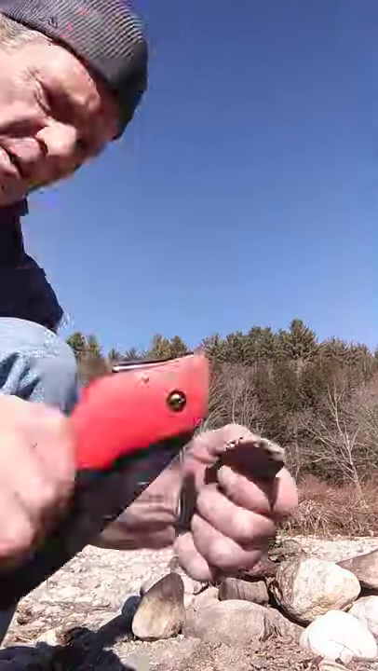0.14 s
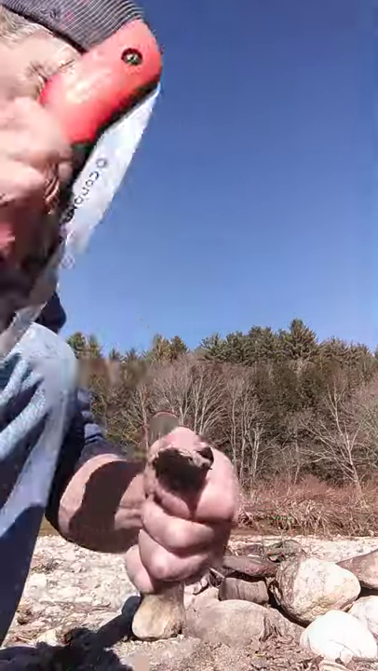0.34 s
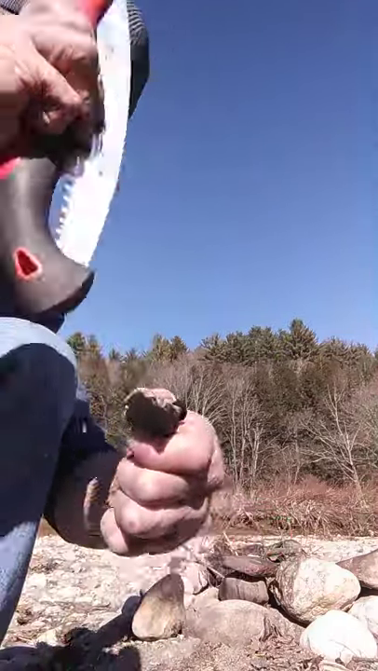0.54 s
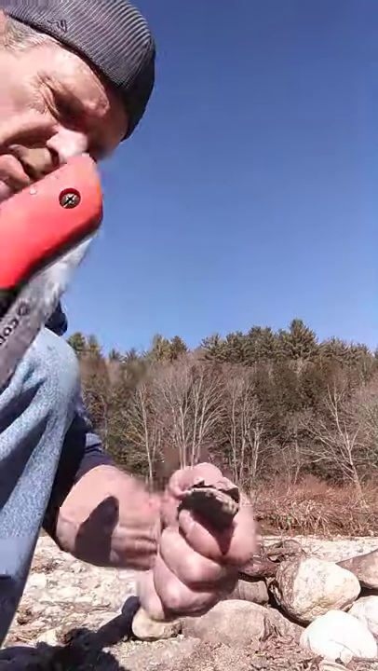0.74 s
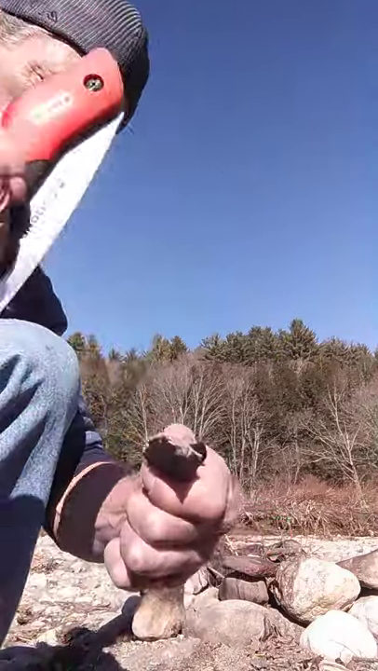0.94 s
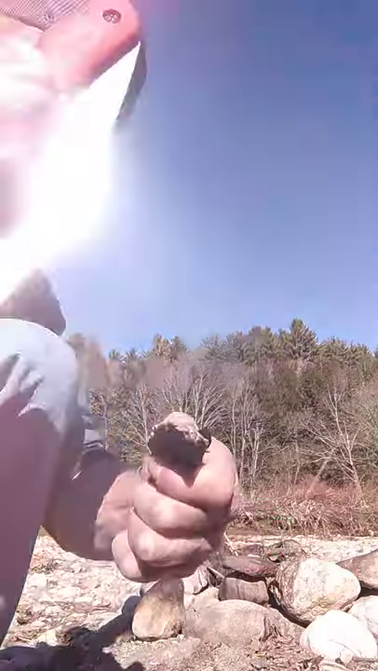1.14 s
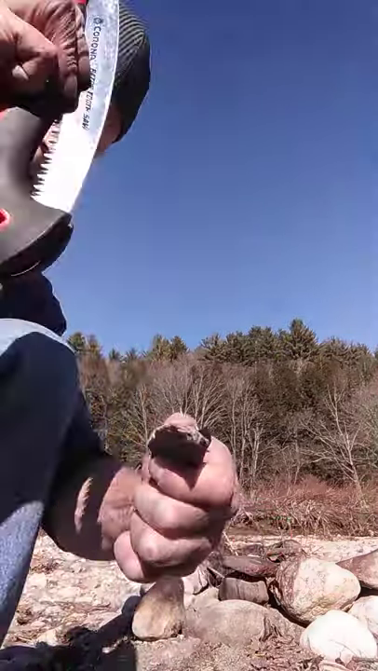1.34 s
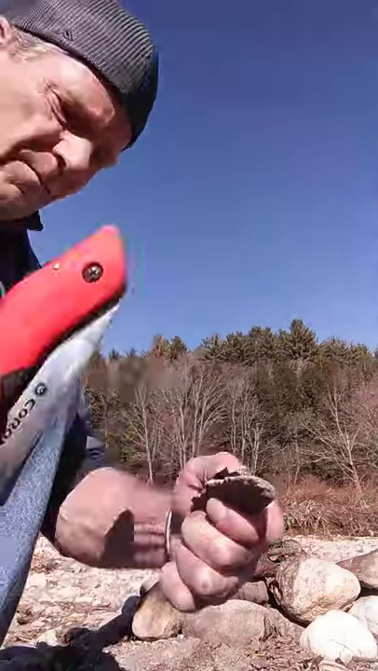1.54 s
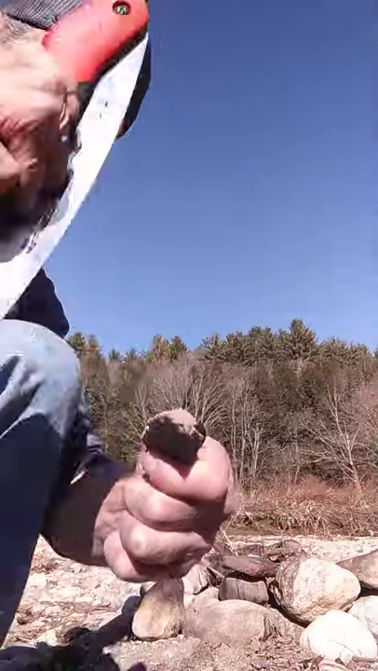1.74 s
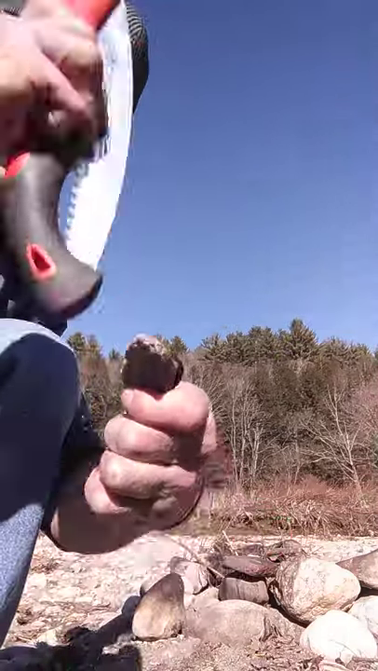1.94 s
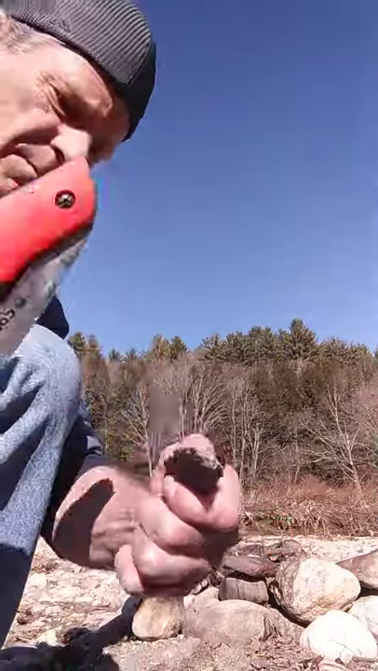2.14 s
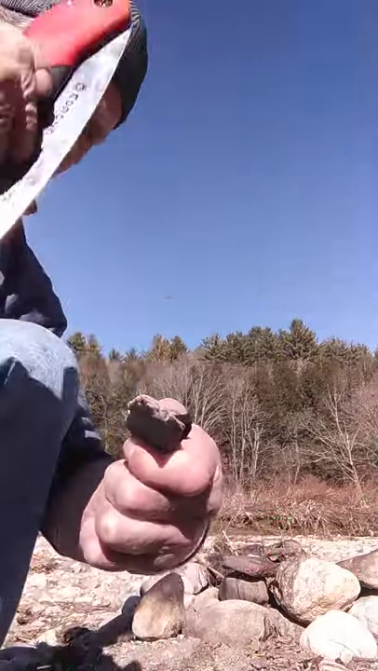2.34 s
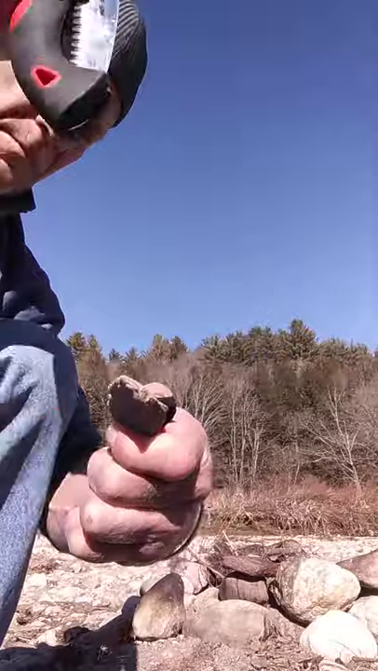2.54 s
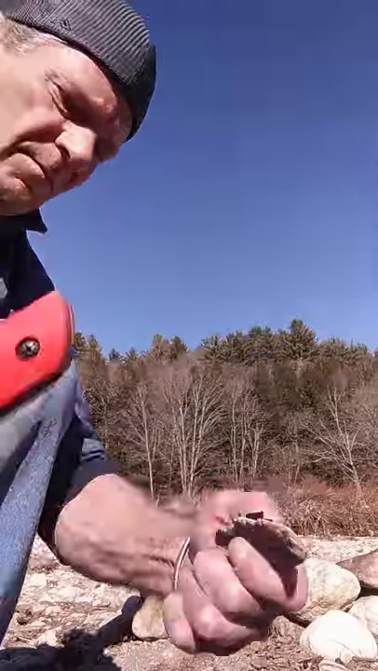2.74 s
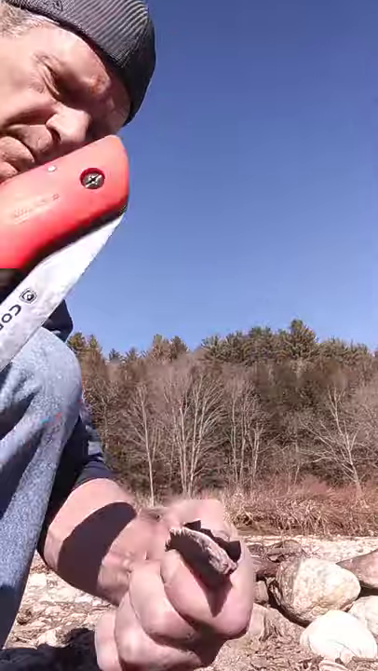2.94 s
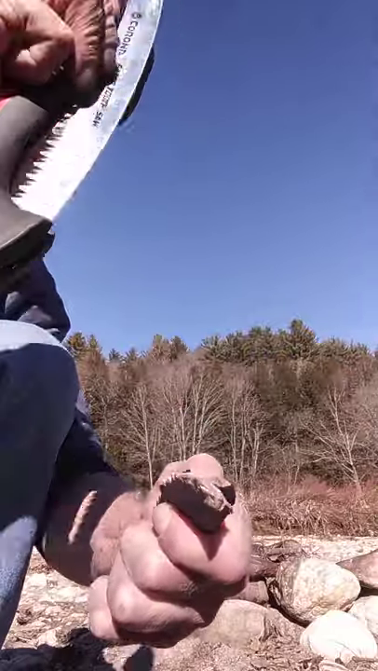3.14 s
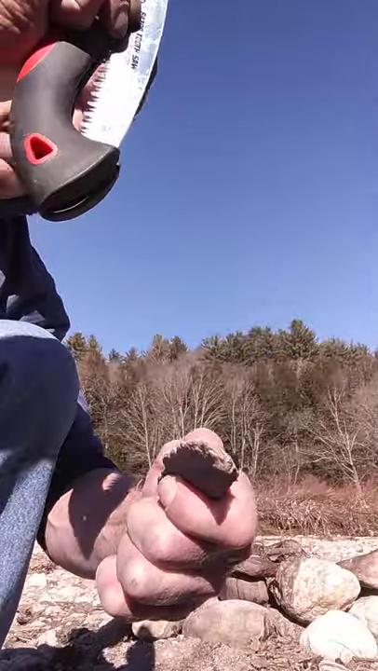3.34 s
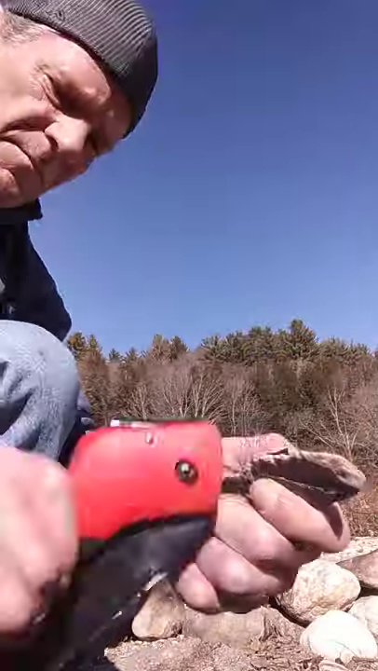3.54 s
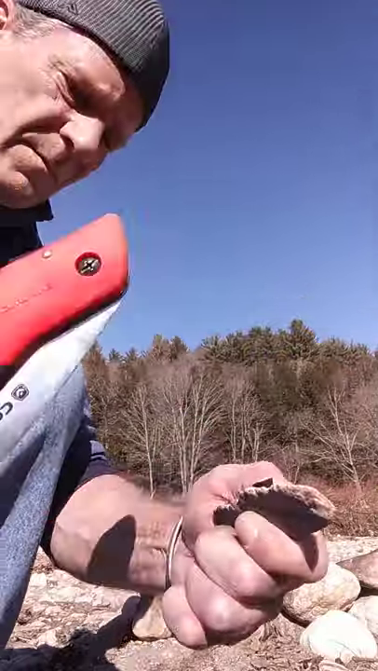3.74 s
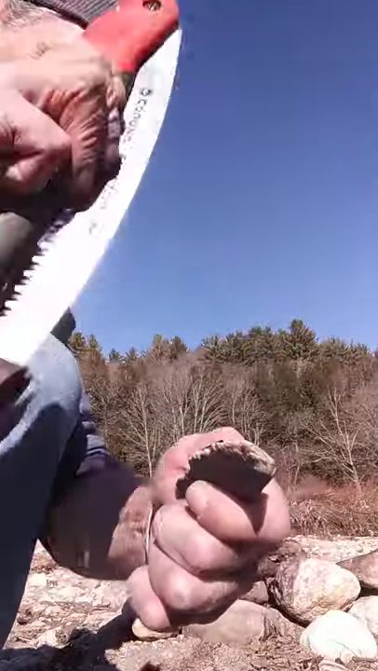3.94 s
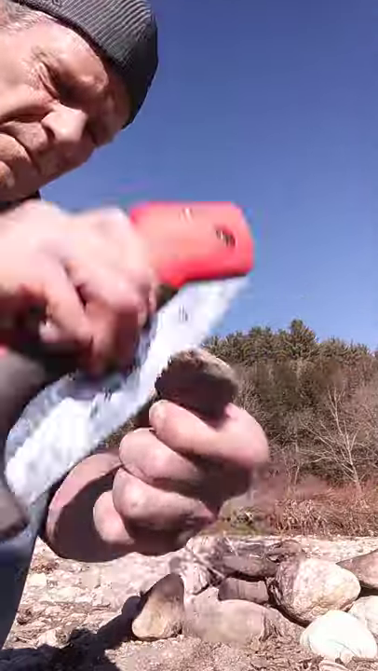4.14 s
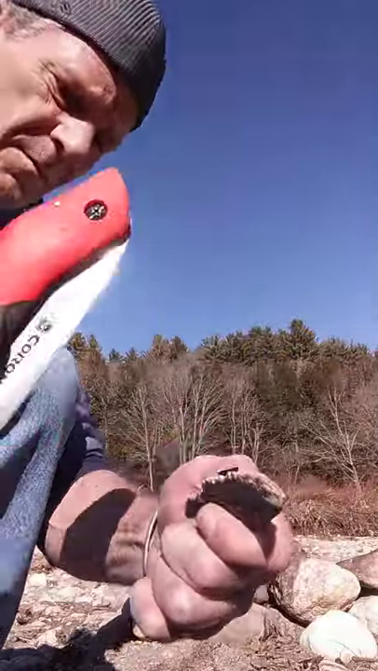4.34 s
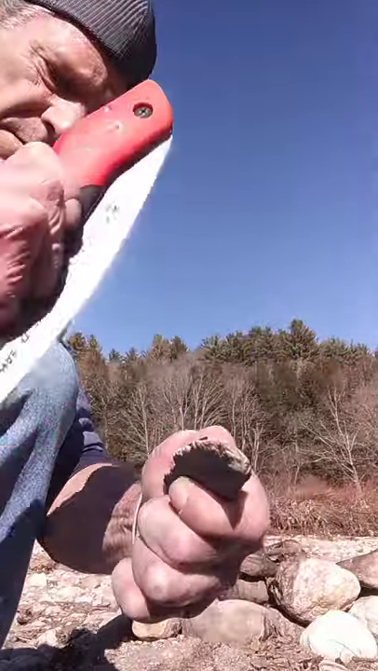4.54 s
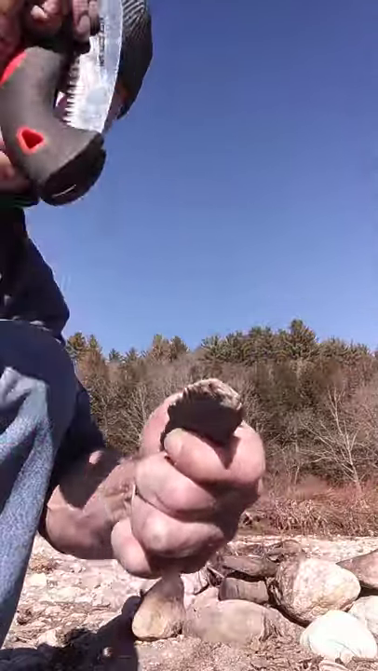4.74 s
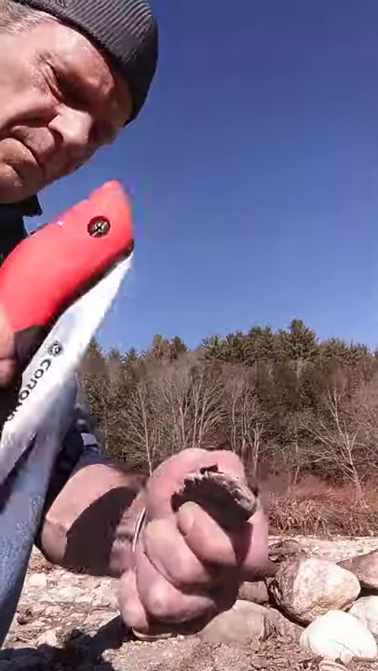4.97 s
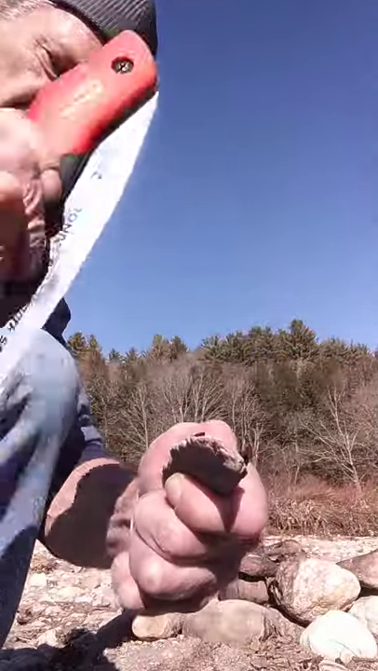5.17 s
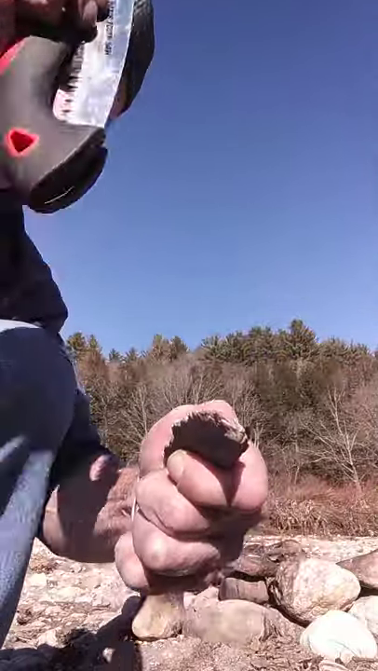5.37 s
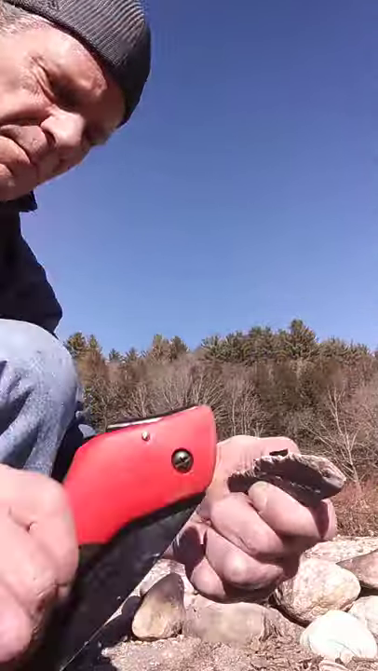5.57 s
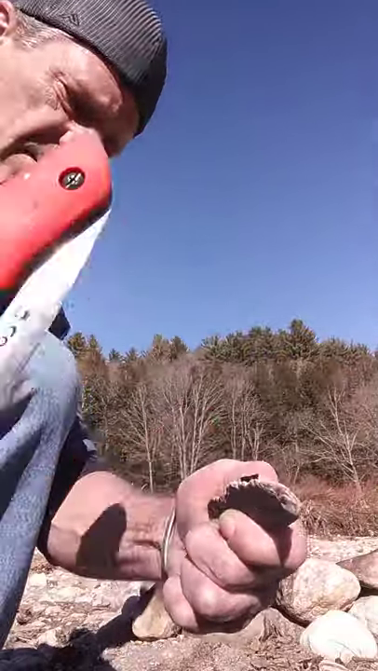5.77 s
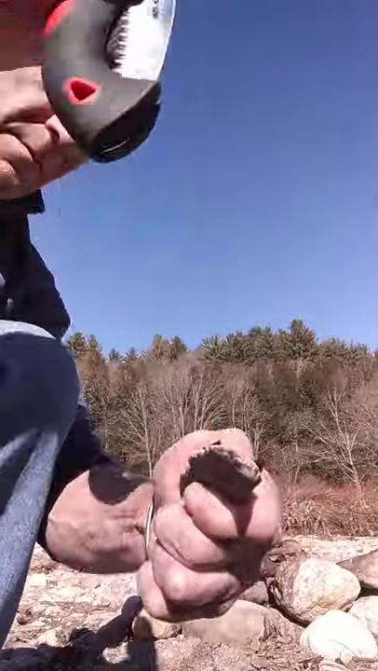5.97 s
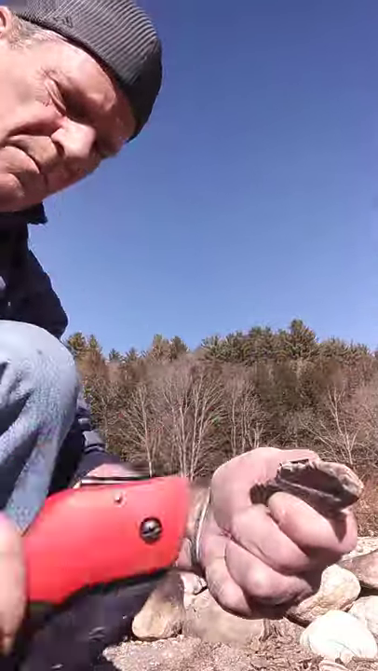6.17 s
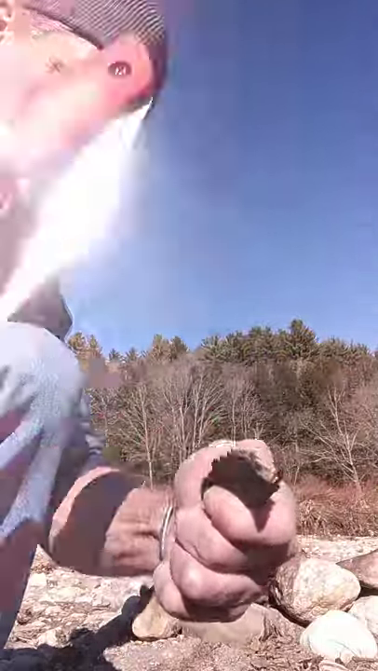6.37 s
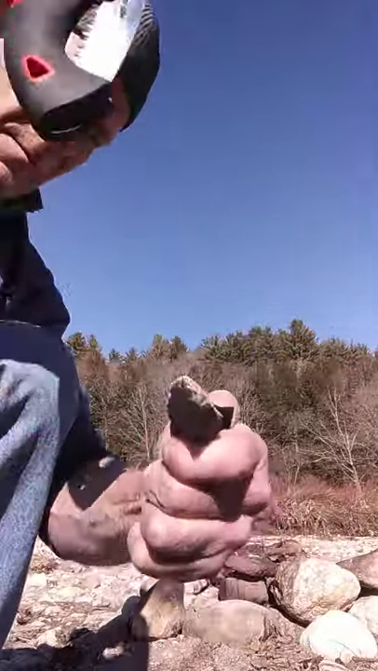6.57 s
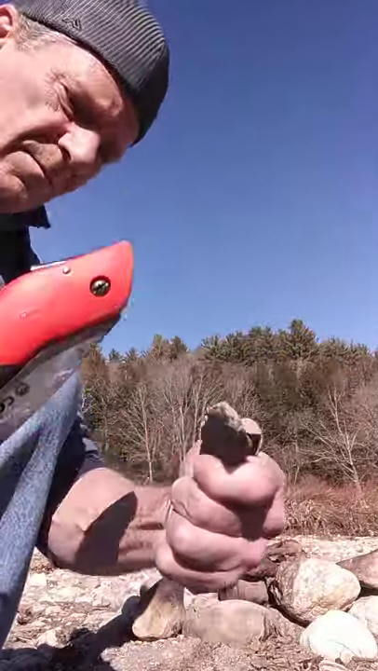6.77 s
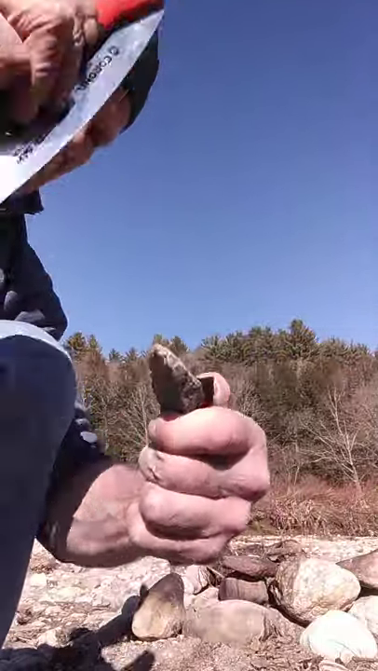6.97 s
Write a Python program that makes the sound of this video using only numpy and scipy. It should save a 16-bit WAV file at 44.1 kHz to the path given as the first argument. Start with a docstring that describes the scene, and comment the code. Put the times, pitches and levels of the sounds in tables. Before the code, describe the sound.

Eleven loud, crisp strikes of steel on flint over about seven seconds, slightly uneven in timing, force and pitch. The first ones clink clearly; later ones are drier and scrapier. Light ticks, hollow knocks and barely audible flakes fall between them. Blade overtones fade within a fraction of a second, with a faint dull outdoor tail. Soft river rush with small bubbles continues throughout; close, mono, bass-light phone sound with squashed peaks.

```python
"""A phone close by on a stony river bank hears a steel saw blade strike a hand-held flint eleven times.
Each blow opens with a crack of filtered noise and a rasp of chipping grains lasting 20 to 30 ms.
As the steel slips off, the stone clinks in decaying modes, while the blade's own modes ring on faintly.
Then come brief touches of the blade, clicks and knocks of noise, faint flakes and a dull tail off the bank.
The river rushes behind throughout, as coloured noise and rising bubbles. The blows overload the microphone."""
import sys
import numpy as np
from scipy import signal
from scipy.fft import rfft, irfft
from scipy.io import wavfile
from scipy.ndimage import uniform_filter1d, minimum_filter1d

SR = 44100
rng = np.random.default_rng(int(sys.argv[2]) if len(sys.argv) > 2 else 0)


def store_wav(level_fs):
    """Save 16-bit WAV to argv[1]."""
    pcm = np.round(np.clip(np.atleast_2d(level_fs), -1, 1) * 32767)
    wavfile.write(sys.argv[1], SR, pcm.T.astype(np.int16))


N = 309141
T = np.arange(int(0.9 * SR)) / SR  # time within one event, in seconds

# Blows of the blade on the flint. Each row: start in seconds, relative level in dB, contact length in
# seconds, clink in dB, extra for the upper clink modes in dB, place along the blade from -1 to 1.
BLOWS = [(.1767, -0.5, 0.021, 3, -10, -.6), (0.6616, 0.5, .026, 1.5, -6.5, -0.16),
         (1.4999, -0.5, 0.025, -0.5, -8, -.5), (2.049, 0, 0.026, -4.5, 5, -0.65),
         (2.7015, 2.5, 0.024, -0.5, -2.5, -.5), (3.5809, 0, 0.028, -3.5, -1, -0.64),
         (4.2184, -3, 0.032, -4.5, -2.5, 0.35), (4.8942, 2.5, 0.029, -1, -5.5, -0),
         (5.6006, -1, .024, -6, 4, 0.57), (6.1898, 4.5, 0.027, -14, -8.5, 0.16),
         (6.7195, 1.5, 0.026, -2, -1.5, -.05)]
# The blade touches the stone again. Each row: start in seconds, relative level in dB,
# clink in dB relative to the touch.
TOUCHES = [(0.6951, -12, 1), (2.0971, -11, 7.5), (2.7827, -4.5, -8), (2.798, -15.5, 5), (3.634, -8.5, 5.5),
           (4.2502, -13, -6), (4.2602, -18.5, 0), (6.238, -20.5, -1)]
# Modes of the flint when free. Each row: nominal frequency in Hz, relative level in dB,
# time to decay by 60 dB in seconds.
FLINT_MODES = [(1700, -14, .06), (3050, -20, .04), (4040, -20, .045), (4805, 0, .052), (5600, 0, .05),
               (6360, -9, .04)]
# Colour of steel scraping on flint. Each row: frequency in Hz, relative level in dB.
RASP_COLOUR = [(300, -27), (650, -28), (1200, -15.5), (1700, -7.5), (2100, -7), (3150, -4.5), (3420, -11),
               (4000, -3), (4650, -0.5), (5050, -3.5), (5650, -1.5), (6600, -6), (7800, -16),
               (15500, -29.5)]


def undb(db):
    """Decibels to amplitude gain."""
    return 10 ** (np.asarray(db) / 20)


def unit(x):
    """Scale to rms 1."""
    return x / np.sqrt(np.mean(x ** 2))


def decay(seconds, t60_s):
    """Exponential decay that falls by 60 dB in t60_s."""
    return np.exp(-np.log(1000) * seconds / t60_s)


def add(track, start_s, sound):
    """Mix a sound into the track, cut off at the track's end."""
    i = int(start_s * SR)
    track[i:i + len(sound)] += sound[:N - i]


def colour(x, points, tilt_db=0):
    """Minimum-phase filter of unit energy through (Hz, dB) points, tilted in dB per octave above 1 kHz."""
    size = 4096
    octave = np.log2(np.maximum(np.fft.rfftfreq(size, 1 / SR), 1))
    hz, db = np.transpose(points)
    level_db = np.interp(octave, np.log2(hz), db) + tilt_db * np.maximum(octave, 10)
    # folding the cepstrum forward in time makes the filter causal
    cepstrum = irfft(np.log(undb(level_db)))
    cepstrum[1:size // 2] *= 2
    cepstrum[size // 2 + 1:] = 0
    response = irfft(np.exp(rfft(cepstrum)))
    return signal.fftconvolve(x, response / np.linalg.norm(response))[:len(x)]


def walk(steps_per_s):
    """Random wander of rms 1: random steps smoothed twice."""
    k = int(SR / steps_per_s)
    steps = np.repeat(rng.standard_normal(N // k + 1), k)
    smooth = uniform_filter1d(uniform_filter1d(steps, k), k)
    return unit(smooth[:N])


def ring(modes, detune):
    """Sum of decaying modes (Hz, dB, t60 in s), which the grip shifts a little from blow to blow."""
    out = np.zeros(len(T))
    for hz, db, t60_s in modes:
        shift, phase = rng.uniform(-1.012, 1, 2)
        cycles = hz * (1 + detune * shift) * T + phase
        out += undb(db) * decay(T, t60_s) * np.sin(2 * np.pi * cycles)
    return out


def blows(rasp_db=-5, bite_db=0, clink_db=-2, blade_db=-32.5, touch_blade_db=-42):
    """Blows crack, rasp, clink and ring the blade; later touches are brief and damp the blows' ringing."""
    slip_s = 0.0065  # the clink starts this long before the contact ends
    tilt_db, tilt_per_db = -1.28, 0.41  # treble in dB per octave; a harder blow is brighter
    out = np.zeros(N)
    for start, db, length, stone_db, upper_db, place in BLOWS:
        scrape = rasp(length, -10, tilt_db + tilt_per_db * db, release_t60_s=0.045)
        add(out, start, undb(bite_db + db) * bite())
        add(out, start, undb(rasp_db + db) * scrape)
        add(out, start + length - slip_s, undb(clink_db + stone_db) * clink(upper_db, build_s=0.0052))
        add(out, start, undb(blade_db) * blade(place) * damping(start))
    for start, db, stone_db in TOUCHES:
        scrape = rasp(0.0021, 0, 0, release_t60_s=0.031)
        # a touch wakes mostly the lower clink
        stone = clink(upper_db=-12.5, build_s=0.002)
        add(out, start, undb(rasp_db + db) * scrape)
        add(out, start, undb(clink_db + db + stone_db) * stone)
        add(out, start, undb(touch_blade_db + db) * blade(0))
    return out


def bite(t60_s=0.033, tilt_db=1):
    """The bright crack of first contact: decaying noise in the colour of the rasp."""
    return colour(rng.standard_normal(len(T)) * decay(T, t60_s), RASP_COLOUR, tilt_db)


def rasp(length_s, pressure_fade_db, tilt_db, release_t60_s, grains_per_s=9000, chatter_hz=380, body_db=-5):
    """Steel chips the flint: dense grains in uneven slips, dying away once the contact ends."""
    grains = (rng.random(len(T)) < grains_per_s / SR) * rng.standard_normal(len(T))
    slip_levels = rng.standard_normal(len(T))
    slips = undb(2.6 * np.interp(T * chatter_hz, np.arange(len(T)), slip_levels))
    # the push weakens over the contact
    pressure = undb(pressure_fade_db * np.minimum(T / length_s, 1))
    release = decay(np.maximum(T - length_s, 0), release_t60_s)
    force = unit(grains * slips) * pressure * release
    # while the steel presses on it, the stone's modes are damped
    body = ring([(hz, db, 0.02) for hz, db, _ in FLINT_MODES], detune=0.012)
    stone = signal.fftconvolve(force, body / np.linalg.norm(body))[:len(T)]
    return colour(force, RASP_COLOUR, tilt_db) + undb(body_db) * stone


def clink(upper_db, build_s):
    """The stone's short ring, which builds up as the steel slides off its edge."""
    modes = [(hz, db + upper_db * (hz > 5200), t60_s) for hz, db, t60_s in FLINT_MODES]
    return ring(modes, detune=0.005) * (1 - np.exp(-(T / build_s) ** 2))


def blade(place):
    """The place where the blade is hit sets how loud each of its modes sings."""
    # Modes of the steel blade. Each row: nominal frequency in Hz, relative level in dB at place 0,
    # time to decay by 60 dB in seconds, change in dB per unit of place along the blade.
    blade_modes = [(893, -14, .4, 0), (1932, -12, .3, 4), (2158, -6, .28, 0), (2380, -1.5, .48, 0),
                   (3480, -11, .22, 3), (3994, -7, .26, 2), (4118, 0, .25, -1), (4231, -8, .26, 1),
                   (4340, -13, .26, 0), (4558, -8, .42, 13), (4562, -14, .6, 11), (4843, -9, .25, 0),
                   (5095, 0, .26, -3), (5663, -16, .3, 0), (5740, -16, .3, 0), (6017, -19, .7, -1)]
    modes = [(hz, db + place * change_db, t60_s) for hz, db, t60_s, change_db in blade_modes]
    return ring(modes, detune=0.0003)


def damping(start, share=0.63):
    """Each touch after a blow stops a share of the blade's ring; a harder touch stops more."""
    gain = np.ones(len(T))
    for touch, db, _ in TOUCHES:
        if touch > start:
            gain[T > touch - start] *= 1 - share * undb(db)  # the full share is for a touch at 0 dB
    return gain


def clicks_and_knocks(octave_t60_s=0.024):
    """Short clicks, and hollow knocks near 1.8 kHz, probably the flint's low mode; narrower bands ring longer."""
    # Short clicks and hollow knocks. Each row: start in seconds, relative level in dB,
    # centre in Hz, width in octaves.
    bursts = [(.3425, -22.5, 2300, 2.4), (.4904, -40, 2280, 2), (.8795, -42.5, 2200, 1.8),
              (2.759, -23.5, 1850, 0.65), (2.798, -23, 1720, 0.29), (2.9694, -39.5, 1670, 1.8),
              (4.7007, -41.5, 2120, 1.8), (5.633, -22.5, 1840, .6), (6.164, -40.5, 4160, 2.2),
              (6.2573, -17, 3080, 2.02), (6.8249, -9.5, 1920, 2.77)]
    out = np.zeros(N)
    for start, db, hz, octaves in bursts:
        spread = 2 ** (octaves / 2)
        add(out, start, undb(db) * click(hz / spread, hz * spread, octave_t60_s / octaves))
    return out


def click(low_hz, high_hz, t60_s, order=3):
    """A decaying burst of noise between two edges, made up in level for its bandwidth."""
    edges = signal.butter(order, [low_hz, high_hz], "band", fs=SR, output="sos")
    burst = rng.standard_normal(len(T)) * decay(T, t60_s)
    return signal.sosfilt(edges, burst) * np.sqrt(SR / 2 / (high_hz - low_hz))


def chips(flake_db=-55, size_db=8, count=2):
    """Flakes knocked off by each blow patter faintly on the stones as octave-wide clicks."""
    out = np.zeros(N)
    for start, *_ in BLOWS:
        for flight, size, pitch in rng.random((count, 3)):
            low_hz = 1800 * 4 ** pitch
            landing = start + 0.08 + 0.2 * flight
            add(out, landing, undb(flake_db + size_db * size) * click(low_hz, 2 * low_hz, t60_s=0.012))
    return out


def bank(near, tail_db=-42):
    """Stones and trees scatter a faint, dull tail back: convolution with swelling, fading noise."""
    b, a = signal.iirpeak(1900, 0.5, SR)  # a broad resonance, applied twice
    noise = signal.lfilter(b, a, signal.lfilter(b, a, rng.standard_normal(len(T))))
    tail = noise * decay(T, 0.45) * (1 - np.exp(-T / 0.015))
    return undb(tail_db) * signal.fftconvolve(near, tail / np.linalg.norm(tail))[:N]


def river(level_db=-51.5, swell_db=0.5, flicker_db=1.6, babble_db=-9, count=700):
    """Rushing water: coloured noise whose low band swells and flickers, with small rising bubbles."""
    # Colour of the rushing water. Each row: frequency in Hz, relative level in dB.
    water_colour = [(76, -69), (130, -39.5), (191, -12.5), (328, -0.5), (444, -4), (511, -1), (664, -2.5),
                    (863, -5), (1030, -12), (2560, -19), (3390, -20.5), (4880, -15.5), (9670, -31),
                    (15100, -38), (16000, -45)]
    swell = undb(swell_db * walk(5))
    rush = colour(rng.standard_normal(N), water_colour)
    low = signal.sosfiltfilt(signal.butter(2, 1100, fs=SR, output="sos"), rush)
    bubbles = np.zeros(N)
    t = T[:SR // 10]
    for when, pitch, size in rng.random((count, 3)):
        cycles = 290 * 3 ** pitch * t
        tone = np.sin(2 * np.pi * cycles * (1 + 0.0095 * cycles))  # pitch rises
        add(bubbles, when * N / SR, undb(9 * size) * np.exp(-cycles / 5) * tone)
    water = low * undb(flicker_db * walk(17)) + undb(babble_db) * unit(bubbles)
    return undb(level_db) * unit(water * swell + rush - low)


def scene():
    """Blows, clicks and falling flakes in front of the bank and river, the same in both ears."""
    near = blows() + clicks_and_knocks() + chips()
    return np.tile(near + bank(near) + river(), (2, 1))


def limiter(x, ceiling, hold_s=0.00085):
    """Fast gain control that holds the peaks at the ceiling."""
    size = int(hold_s * SR)
    gain = ceiling / np.maximum(np.abs(x).max(axis=0), ceiling)
    return x * uniform_filter1d(minimum_filter1d(gain, size), size)


def record(dry, wind_cut_hz=160, top_hz=15800):
    """The phone cuts the bass, limits the blows, rounds the peaks that are left and cuts the top."""
    thin = signal.sosfilt(signal.butter(4, wind_cut_hz, "high", fs=SR, output="sos"), dry)
    held = limiter(thin, ceiling=0.85)
    rounded = held / (1 + (held / 0.69) ** 8) ** (1 / 8)  # soft clipping towards 0.69
    return signal.sosfilt(signal.ellip(8, 0.2, 70, top_hz, fs=SR, output="sos"), rounded)


dry = scene()
out = record(dry)
store_wav(out)
```